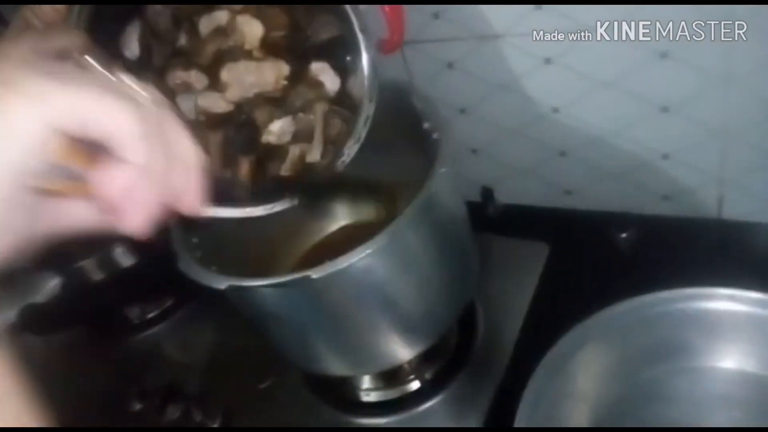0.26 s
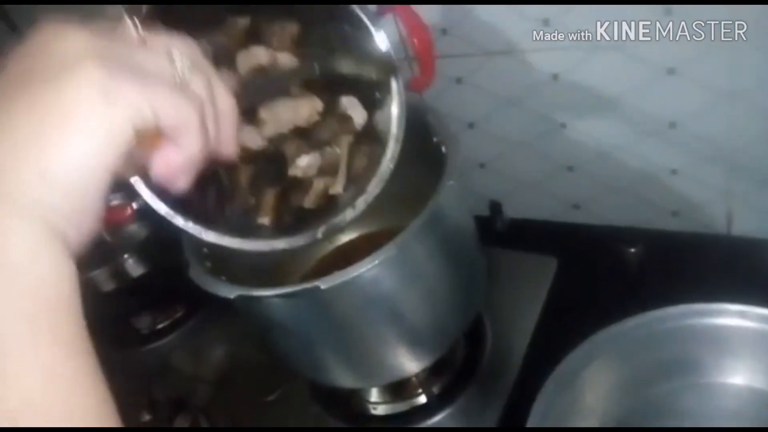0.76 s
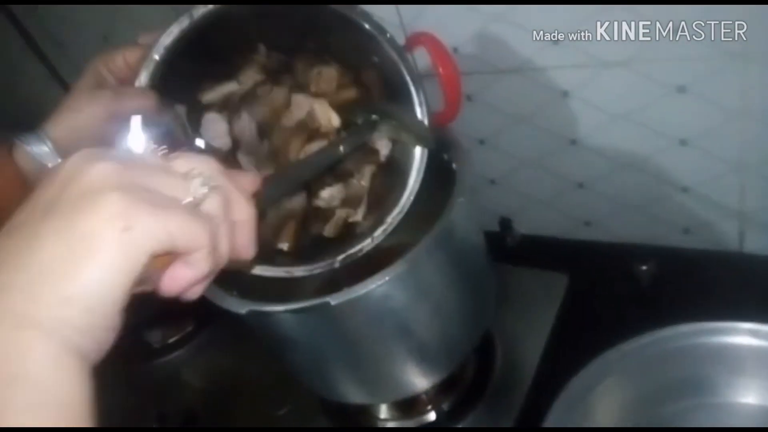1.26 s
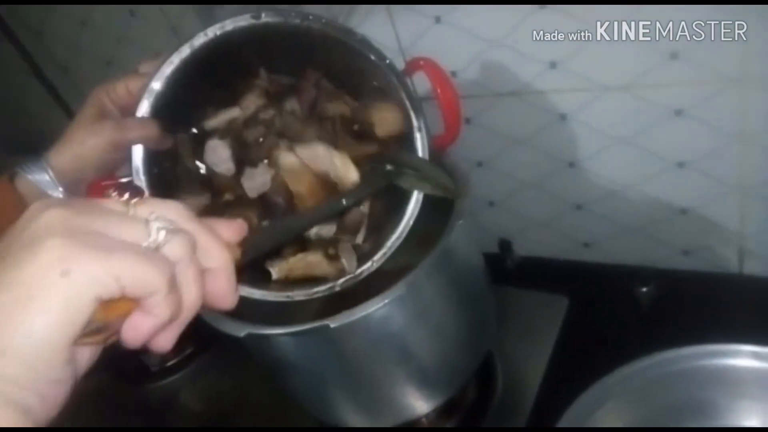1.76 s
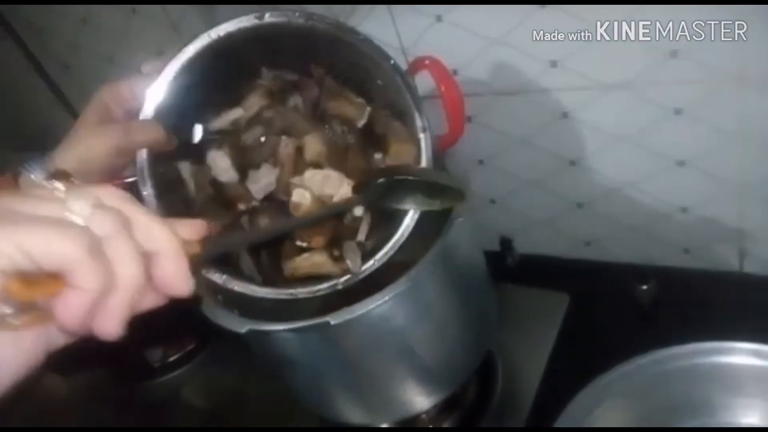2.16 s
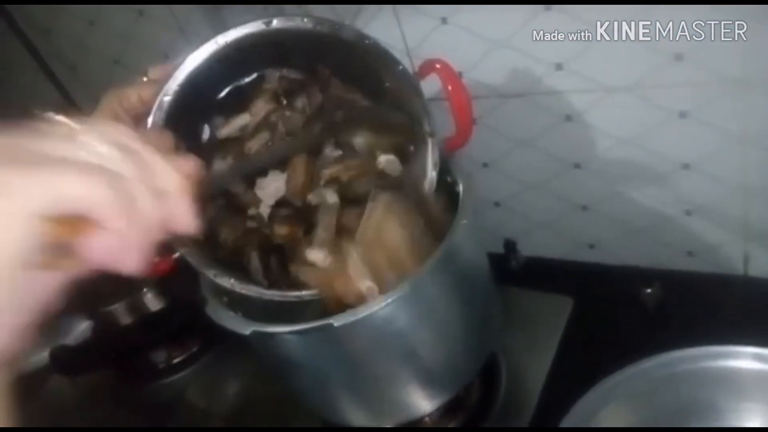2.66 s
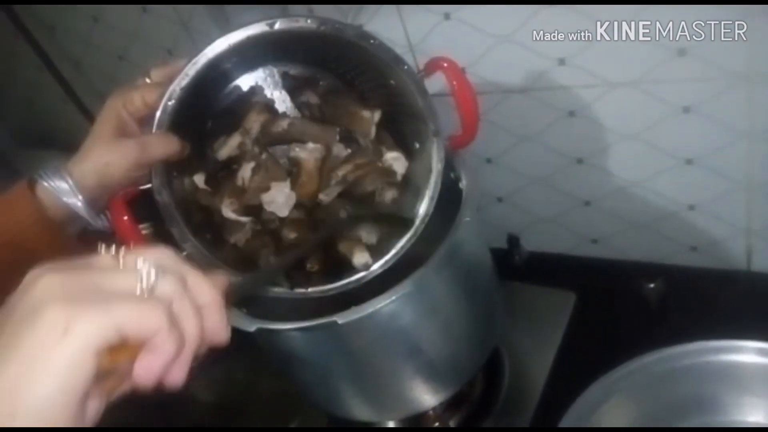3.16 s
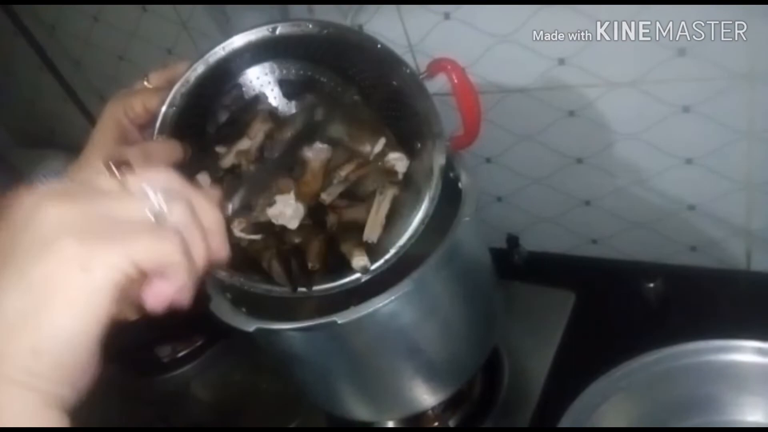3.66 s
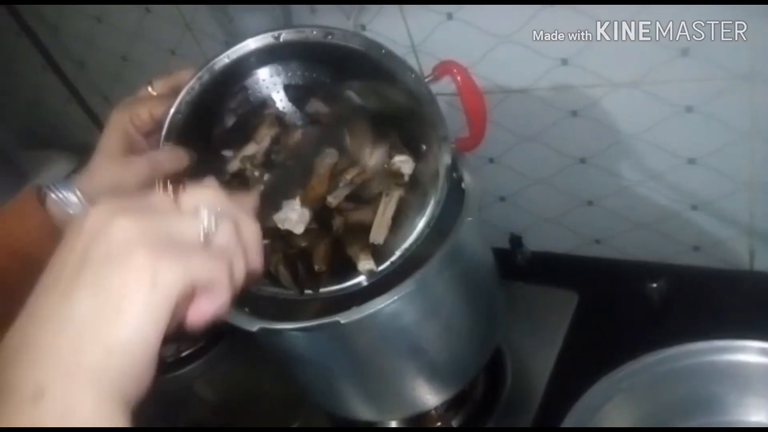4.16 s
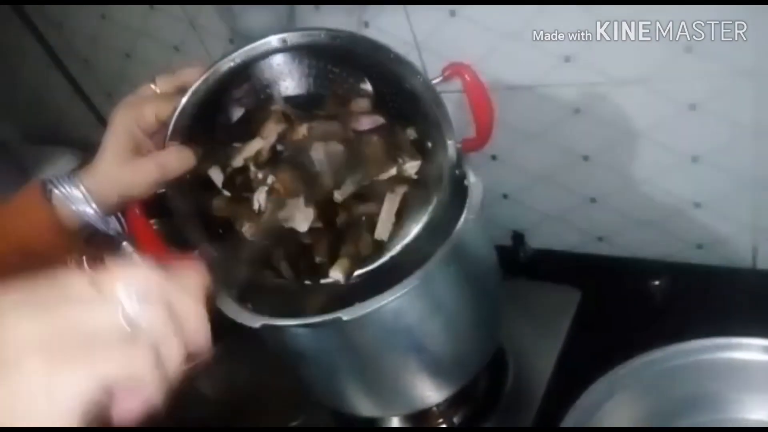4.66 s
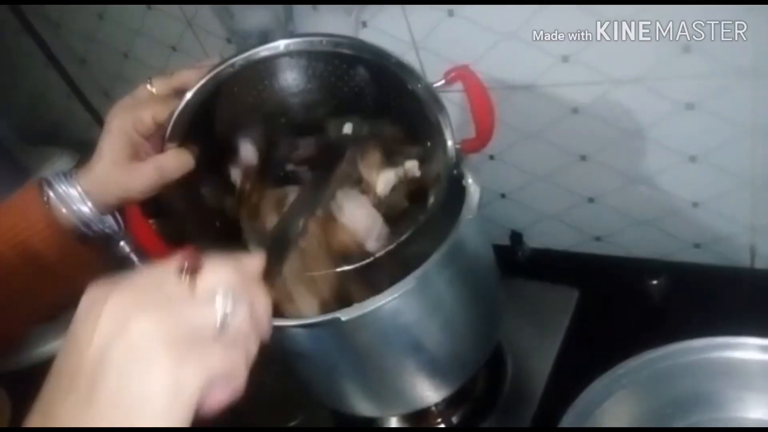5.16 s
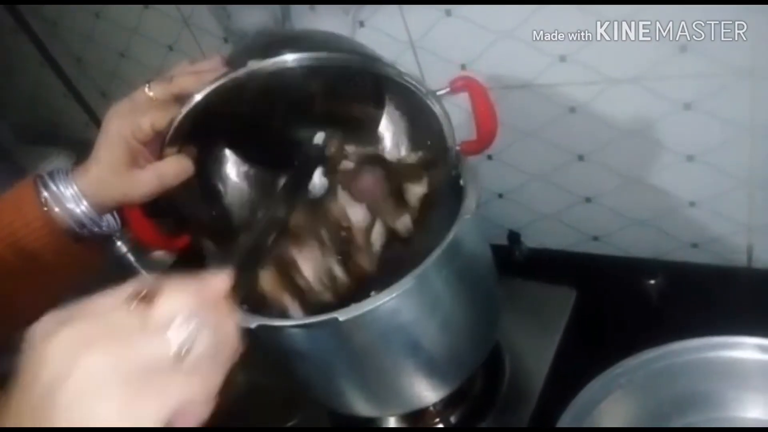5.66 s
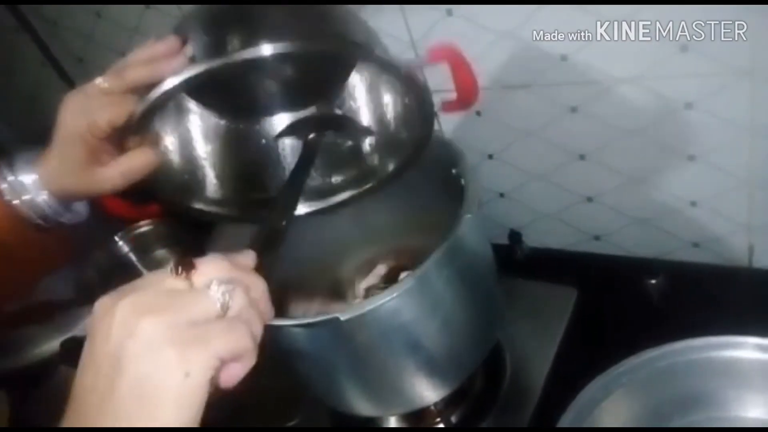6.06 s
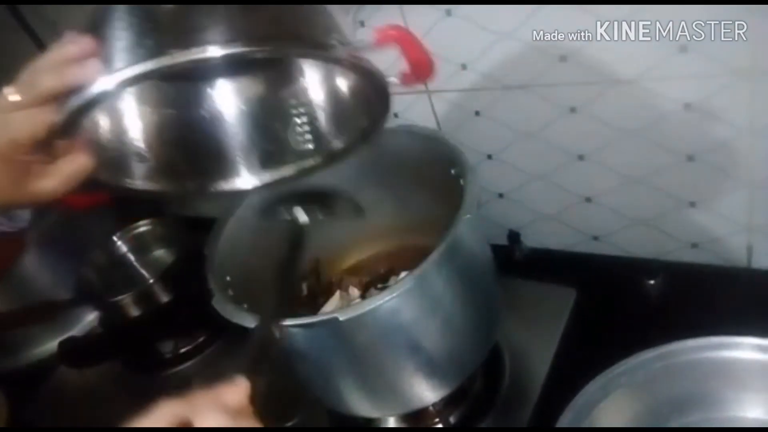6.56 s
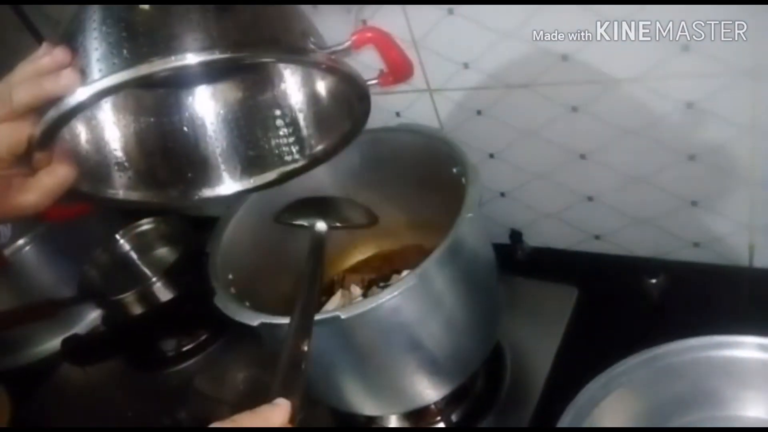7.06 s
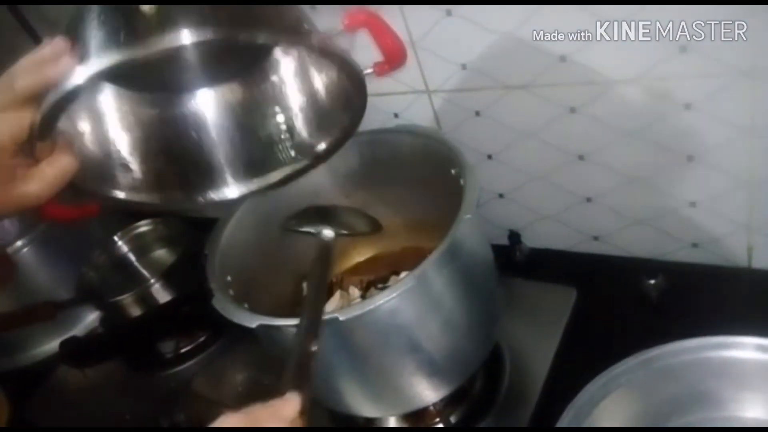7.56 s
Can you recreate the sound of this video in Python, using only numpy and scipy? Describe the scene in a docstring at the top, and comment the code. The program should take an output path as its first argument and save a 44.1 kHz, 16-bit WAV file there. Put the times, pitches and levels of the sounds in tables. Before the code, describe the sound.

Steel tool clanks and scrapes against a metal bowl in bursts, meat and bones rattling out and thudding into a deep pot, small kitchen, faint hum.

```python
"""In a small kitchen, pieces of meat and bone are pushed with a steel tool out of a colander into a pot.
Steel clanks on steel and rings: each blow excites damped modes and a noisy crack.
The heap rattles and slides as clumped clicks, and pieces thud as bumps that ring the pot's low modes.
Short pings are small clusters of close, wobbling, decaying sines, over a faint hum of filtered noise;
sparse taps form the room."""
import sys
import numpy as np
from scipy import signal
from scipy.fft import rfft, irfft
from scipy.io import wavfile
from scipy.ndimage import uniform_filter1d

SR = 44100
rng = np.random.default_rng(int(sys.argv[2]) if len(sys.argv) > 2 else 0)


def boost_factor(decibels):
    """Convert a level in decibels to a linear amplitude factor."""
    exponent = np.asarray(decibels, float) / 20
    return 10 ** exponent


def wav_out(sig):
    """Save sig, one row per channel (or a flat mono array), as 16-bit PCM at SR to the path in sys.argv[1]."""
    wavfile.write(sys.argv[1], SR, np.round(np.clip(np.atleast_2d(sig).T, -1, 1) * 32767).astype(np.int16))


N = 343980

# modes of the steel: f/Hz
STEEL_HZ = [650, 760, 925, 1200, 1430, 1615, 1760, 1994, 2270, 2468, 2855, 2908, 3110, 3234, 3720, 4270,
            4490, 4800, 4826, 5030, 5225, 5640, 5770, 6075, 6350, 6615, 7350, 8300, 8750, 10900]
# their decay and excitation, in the same order:
# t60/s of the free mode, relative level/dB when struck at the bowl bottom, bowl wall, tool, bowl rim
STEEL_MODES = [(0.069, -5.5, -23.5, -29, -26.5), (0.42, 2.5, -5, -21, -30.5), (0.11, -2, -11, -41, -42.5),
               (0.36, -7, -38, -15, -64.5), (0.054, 1, -8, -38.5, -12), (0.37, -19.5, 2.5, -37, -47),
               (0.044, -24, -13, -41, -39), (0.13, -15.5, 6.5, -19.5, -44.5),
               (0.033, -12.5, -1, -28.5, -7.5), (0.77, -24, -6, -72.5, -23.5), (0.33, -21.5, -40, -13, -22),
               (0.19, -19.5, -8, -2.5, -51), (0.045, -12.5, -21.5, -19, -10.5),
               (0.2, -14.5, -28, -4, -24.5), (0.17, -18, -5, -7.5, -41.5), (0.064, -38.5, -7.5, -39.5, -14),
               (0.17, -45.5, -15.5, -23, -64.5), (0.11, -29.5, -38, -10, 1.5), (0.16, -24, -42, -24, -1.5),
               (0.057, -44, -42.5, -16, -6), (0.077, -16, -63, -20, -17.5), (0.054, -13, -42, -3, -28),
               (0.4, -37.5, -55, -41.5, -4.5), (0.36, -29, -15.5, -45, -8), (0.32, -26, -19.5, -49.5, -6),
               (0.046, -23, -52, -70, -5), (0.14, -31.5, -13, -31.5, -5.5), (0.05, -58, -27, -24, -50.5),
               (0.04, -64.5, -45.5, -39, -30.5), (0.075, -54.5, -28.5, -48, -17)]


def read(points, hz):
    """Spectral interpolation: the value of a spectrum table on a log-frequency axis."""
    f, value = np.transpose(points)
    return np.interp(np.log(hz + 1), np.log(f + 1), value)


def evened(x):
    """Normalisation of power: scales to rms 1."""
    return x / np.sqrt(np.mean(x ** 2) + 1e-20)


def coloured(x, points):
    """Linear filtering: multiplies the spectrum of the last axis by a table in dB."""
    n = x.shape[-1]
    return irfft(rfft(x) * boost_factor(read(points, np.fft.rfftfreq(n, 1 / SR))), n)


def pair(alike, shape):
    """Partial coherence: two noises that share a part, alike being their correlation."""
    a, b = rng.standard_normal((2, *shape))
    alike = np.clip(alike, 0, 1)
    return np.array([a, alike * a + np.sqrt(1 - alike ** 2) * b])


def swells(rows, rise_db_s, fall_db_s):
    """Exponential envelopes: power of each event in steps of 32 samples, as rise, hold and fall."""
    s, db, hold = np.transpose(rows)[:3, :, None]
    t = np.arange(N // 32 + 1) * 32 / SR
    rise_db = rise_db_s * np.maximum(s - t, 0)
    fall_db = fall_db_s * np.maximum(t - s - hold, 0)
    return boost_factor(db - rise_db - fall_db) ** 2 + 1e-30


def stretched(steps):
    """Linear interpolation from steps of 32 samples to every sample."""
    return np.interp(np.arange(N) / 32, np.arange(len(steps)), steps)


def blows():
    """Modal excitation: the struck spots weight the steel modes, under a crack of like broad colour."""
    # blows: t/s, crack level/dB, bowl level/dB, place on the bowl, tool level/dB
    # place blends the two nearest spots: 0 bottom, 1 wall, 2 rim, and round to 3 bottom again
    blow_rows = [(.0044, -52, -60, 2.57, -52.5), (.185, -46, -50, 2.96, -57.5),
                 (0.2477, -24, -43.5, 2.21, -40), (0.2658, -33, -54.5, 2, -45),
                 (0.636, -55, -61, 0.34, -60.5), (0.7534, -45.5, -55, 0.18, -56),
                 (1.019, -43.5, -47, 0.044, -54), (1.4175, -59, -54.5, 0.072, -50.5),
                 (1.473, -53.5, -42.5, 2.5, -50), (1.5004, -27.5, -35, 2.49, -54.5),
                 (1.5199, -54, -42.5, .03, -51), (1.5924, -23.5, -30, 1.49, -34),
                 (1.627, -25, -44.5, 1.1, -29), (1.6993, -48, -46, 1.53, -36),
                 (1.8245, -30.5, -46, 0.19, -37), (2.2373, -63, -45.5, 0.12, -62.5),
                 (2.2508, -53, -46.5, 0.063, -63), (2.6718, -58.5, -69, 0.3, -67),
                 (2.714, -27.5, -34, 0.47, -33.5), (2.7982, -27.5, -59.5, 1.01, -67),
                 (2.809, -26, -37, 1.19, -35.5), (2.8499, -31.5, -42, 0.71, -47),
                 (2.884, -34, -64, 0.76, -64), (2.9364, -37, -56.5, 0.63, -65),
                 (3.0586, -48, -64, 0.19, -60), (3.104, -45, -54, 0.1, -54), (3.129, -29, -35, 0.34, -44),
                 (3.1794, -39, -49.5, 2.84, -42), (3.9, -48.5, -46.5, 2.74, -53.5),
                 (4.8959, -50.5, -55, 2.4, -78), (5.1559, -34, -51, 1.7, -69),
                 (5.199, -41.5, -72, 0.19, -78.5), (5.2649, -22, -26.5, 1.1, -25),
                 (5.3535, -29, -41.5, 0.53, -35), (5.3893, -70, -41, 0.82, -32.5),
                 (5.4363, -41, -59, 3.1, -39), (5.4917, -30.5, -39, 1.37, -41),
                 (5.819, -47.5, -56, 0.53, -100), (5.8665, -35.5, -49, 2.62, -59),
                 (5.8883, -37.5, -47, 0.31, -52), (5.9544, -43, -47.5, 0.21, -60),
                 (5.9867, -41.5, -70, 1.32, -63), (6.1406, -44.5, -80.5, 0.45, -72.5),
                 (6.401, -59.5, -66, 2.68, -77), (6.9486, -64.5, -73, 1, -68)]
    # spectrum of the crack: f/Hz, relative level/dB
    crack_colour = [(250, -10.5), (500, -6.5), (1000, 0.5), (2000, -6), (4000, -3.5), (6500, 4.5),
                    (7500, -5), (9000, -5), (13000, -19.5), (16000, -22.5)]
    far_spot_db = -27.5  # every spot of the bowl rings a little
    low_detune = .09  # full range, as a share of f: the heap loads the bowl anew for each blow
    twin_split, twin_share = .008, .7  # largest split as a share of f; amplitude of the twin
    dull_db, dull_hz = -14, 8000  # blows at the loaded bottom of the bowl lose their top
    soft_rise_s = .004  # the weakest blows are glancing and rise more slowly

    t, bins = np.arange(SR // 2) / SR, np.fft.rfftfreq(8192, 1 / SR) + 1
    hz, (t60, *spots_db) = np.array(STEEL_HZ), np.transpose(STEEL_MODES)
    first = SR // 40  # the 25 ms over which ring and crack are scaled
    # hand and meat choke most of the ring; a little rings on
    held = (boost_factor(-300 * t) + boost_factor(-27.0)) * (1 - np.exp(-t / 0.011))
    held /= np.sqrt(np.mean(held[:first] ** 2))
    rings = held * boost_factor(-60 * t / t60[:, None]) * np.exp(2j * np.pi * hz[:, None] * t)
    # a round bowl splits each mode in two, and the pair beats
    split_hz = twin_split * hz * rng.uniform(.5, 1, len(hz))
    twins = rings * np.exp(2j * np.pi * split_hz[:, None] * t)

    short = t[:8192]
    onset = 1 - np.exp(-short / 0.0021)
    snap, shimmer = boost_factor(-900 * short) * onset, boost_factor(-13.5 - 420 * short) * onset
    # spreads each mode over its neighbourhood
    octaves = np.log2(np.clip(bins, 500, 7000)[:, None] / hz)
    near = np.exp(-(octaves / 0.22) ** 2)

    out = np.zeros((2, N + len(t)))
    chance = rng.random((len(blow_rows), 4, len(hz)))
    for (s, crack_db, bowl_db, place, tool_db), (turn, side, scatter, load) in zip(blow_rows, chance):
        away = abs((place - np.arange(3) + 1.5) % 3 - 1.5)
        bottom, wall, rim = boost_factor(bowl_db) * (np.maximum(1 - away, 0) + boost_factor(far_spot_db))
        weight = np.array([bottom, wall, boost_factor(tool_db), rim]) @ boost_factor(np.array(spots_db))
        dulling_db = dull_db * max(1 - away[0], 0) / (1 + (dull_hz / bins) ** 4)
        colour = (near @ weight / near.sum(1)) ** 1.3 * boost_factor(read(crack_colour, bins) + dulling_db)

        weight = weight * boost_factor(9 * scatter - 6.3) * np.exp(2j * np.pi * turn)
        # each mode reaches the two ports in its own phase
        weight = np.array([weight, weight * np.exp(3.2j * (side - .5))])
        shift_hz = low_detune * hz * (load - .5)
        shifted = rings[:5] * np.exp(2j * np.pi * shift_hz[:5, None] * t)
        ring = weight[:, :5] @ shifted + weight[:, 5:] @ rings[5:]
        twin_ring = twin_share * weight * np.exp(2j * np.pi * load) @ twins
        sound = (ring + twin_ring).real

        noise = rfft(pair(0.11, (2, 8192))) * colour
        # thin steel: a thicket of narrow modes, new for each blow
        small_modes = 0.033 + (rng.random(len(bins)) < .04)
        # the contact chatters
        bounces = boost_factor(8.8 * evened(uniform_filter1d(rng.standard_normal(8192), 150)))
        crack = evened(irfft(noise[:, 0])) * snap * evened(bounces) ** .5
        crack = crack + evened(irfft(noise[:, 1] * small_modes)) * shimmer
        sound[:, :8192] += boost_factor(crack_db) * crack / np.sqrt(np.mean(crack[:, :first] ** 2))
        rise_s = soft_rise_s * np.clip(-crack_db / 20 - 1.5, .05, 1)
        sound *= np.minimum(t / rise_s, 1)
        at = max(round(s * SR) - 40, 0)
        out[:, at:at + len(t)] += sound
    return out[:, :N]


def shimmers():
    """Modal density: a dozen close modes of unlike strength and decay beat on after clanks and scrapes."""
    # clusters: t/s, level/dB before each mode's own loss, centre f/Hz, spread/Hz, nominal t60/s
    cluster_rows = [(.25, -33.5, 5120, 303.2, 0.35), (.25, -39.5, 5950, 600, 0.47),
                    (.25, -39, 6700, 450, 0.41), (.25, -39.5, 3050, 500, 0.4), (.27, -37, 724, 400, 0.22),
                    (.25, -47.5, 4300, 698, 0.34), (2.81, -29.5, 6100, 800, 0.17),
                    (2.809, -30, 3100, 2000, .1), (4.508, -52.5, 3350, 1000, .15),
                    (6.515, -62, 4700, 600, .3), (5.495, -45, 2880, 250, 0.53),
                    (5.495, -44, 1500, 900, 0.77)]
    t, out = np.arange(SR // 2) / SR, np.zeros((2, N + SR // 2))
    chance = rng.random((len(cluster_rows), 5, 12, 1))
    for (s, db, hz, spread, t60), (step, turn, side, size, life) in zip(cluster_rows, chance):
        modes_hz = hz + spread * ((np.arange(12)[:, None] + step) / 12 - .5)
        mode_t60 = t60 * (.8 + .4 * life)
        fading = boost_factor(db - 8 * size - 60 * t / mode_t60) / 2
        ports = []
        for port in (0, 1):
            cycles = modes_hz * t + turn + port * .6 * (side - .5)
            ports.append((fading * np.sin(2 * np.pi * cycles)).sum(0))
        out[:, round(s * SR):][:, :len(t)] += np.array(ports) * np.minimum(t / .004, 1)
    return out[:, :N]


def pings():
    """Free decay: lone modes of the steel, short pings and many faint random ones die exponentially."""
    # one steel mode stands out of a blow and rings until hand or meat stops it:
    # t/s, level/dB, f/Hz (the nearest steel mode is taken), t60/s, time it rings free/s
    free_rows = [(0.25, -17, 6615, 0.047, 0.023), (.249, -15.5, 5030, 0.029, .03),
                 (0.25, -29.5, 1430, 0.074, .03), (0.248, -19.5, 3110, 0.038, .03),
                 (.755, -46, 3234, 0.17, 0.053), (1.019, -52, 1994, 0.43, 0.073),
                 (1.418, -41.5, 3234, 0.15, .05), (1.506, -36, 3234, 0.4, 0.034),
                 (1.503, -29, 1430, 0.093, 0.018), (1.593, -15, 4800, 0.11, 0.014),
                 (1.592, -22.5, 1994, 0.16, 0.03), (1.6, -43, 5640, 0.66, 0.26),
                 (1.627, -12, 4826, 0.12, 0.012), (1.627, -14, 3234, 0.16, 0.016),
                 (1.64, -39, 2855, 0.67, 0.17), (1.64, -36, 3720, .4, 0.132),
                 (1.693, -32.5, 1994, .25, .02), (1.823, -31, 2855, 0.29, 0.094),
                 (1.823, -28, 4826, 0.099, 0.014), (2.715, -18.5, 1430, 0.052, 0.027),
                 (2.714, -24.5, 4800, 0.054, .03), (2.717, -32, 760, 0.52, 0.038),
                 (2.714, -31.5, 2908, 0.13, 0.025), (2.798, -27, 2270, 0.053, .02),
                 (2.799, -28.5, 1760, 0.15, 0.042), (2.93, -37.5, 1760, 0.25, 0.015),
                 (2.931, -38, 1430, 0.18, 0.027), (3.06, -48, 3720, 0.23, .03),
                 (3.105, -44, 3234, 0.17, 0.021), (3.129, -20, 1994, 0.11, 0.056),
                 (3.139, -33.5, 2468, 0.45, 0.05), (3.128, -33.5, 3234, 0.33, 0.032),
                 (3.129, -34.5, 925, 0.55, 0.13), (3.179, -33, 3234, 0.16, 0.05),
                 (3.177, -42.5, 4800, 0.16, .04), (3.21, -46.5, 1994, 0.67, .17),
                 (3.214, -46, 2468, 0.36, 0.16), (3.9, -44, 650, 0.23, 0.056),
                 (4.896, -54.5, 4270, 0.4, 0.16), (4.897, -47.5, 5225, .085, .05),
                 (5.266, -23.5, 3720, 0.32, 0.086), (5.267, -33, 1615, 0.28, .075),
                 (5.285, -35.5, 2468, 0.37, 0.06), (5.3, -36, 1994, 0.45, 0.05),
                 (5.352, -27, 3234, 0.19, 0.044), (5.36, -19.5, 2908, 0.093, 0.038),
                 (5.362, -33, 1994, 0.53, 0.11), (5.496, -18.5, 2908, 0.066, 0.0073),
                 (5.492, -27, 3720, 0.13, 0.039), (5.495, -27.5, 3234, 0.23, .03)]
    # short pings, some the brief rings of blows or the low onset of a thud, each with close modes:
    # t/s, level/dB, f/Hz
    ping_rows = [(.52, -54.5, 1510), (.601, -51.5, 1630), (2.071, -56, 1440), (2.352, -53.5, 1766),
                 (2.479, -51.5, 740), (2.984, -40, 2380), (3.549, -51.5, 795), (3.776, -51.5, 1446),
                 (3.972, -53.5, 2410), (4.049, -54.5, 2140), (4.138, -53, 2100), (4.238, -51.5, 2380),
                 (4.318, -55, 2376), (4.393, -55, 907), (4.41, -59, 4300), (4.574, -56.5, 2265),
                 (5.836, -46, 5370), (5.866, -35, 3920), (5.868, -28.5, 658), (5.868, -23, 174),
                 (5.886, -29, 221), (5.986, -33, 5110), (6.168, -44.5, 1308), (6.218, -57, 4150),
                 (7.108, -54, 1810), (7.109, -52.5, 2540), (6.685, -57, 4300), (7.554, -59, 1465),
                 (7.553, -55, 2950), (7.689, -55, 1340)]
    ping_t60_s, ping_t60_slope = 0.087, -0.41  # at 1 kHz; higher pings die sooner
    stopped_db_s = 900  # extra fall once a ring is stopped

    t, out = np.arange(SR // 4) / SR, np.zeros((2, N + SR // 4))
    onset = 1 - np.exp(-t / 0.00032)
    rows = []
    for s, db, hz, t60, free in free_rows:
        mode = np.argmin(abs(np.array(STEEL_HZ) - hz))
        rows.append((s, db, STEEL_HZ[mode], t60, free))
    short = [(s, db, hz, ping_t60_s * (hz / 1000) ** ping_t60_slope, 1) for s, db, hz in ping_rows]
    rows += short
    for step in (.94, 1.07):  # two weaker close modes beside each short ping
        rows += [(s + .003, db - 6, hz * step, t60, 1) for s, db, hz, t60, free in short]

    for (s, db, hz, t60, free), side in zip(rows, rng.uniform(-1, 1, len(rows))):
        # close modes drift apart and beat: heard as a wobble of the level
        drift_db = 4.5 * evened(uniform_filter1d(rng.standard_normal(len(t)), 300))
        wobble = boost_factor(np.minimum(t / .025, 1) * np.minimum(drift_db, 2))
        # low rings reach both ports nearly alike
        port_phase = np.array([[0], [1.6 * side * min(hz / 1000, 1)]])
        phase = 2 * np.pi * hz * t + port_phase
        fall_db = 60 * t / t60 + stopped_db_s * np.maximum(t - free, 0)
        out[:, round(s * SR):][:, :len(t)] += boost_factor(db - fall_db) * np.sin(phase) * onset * wobble

    for hz in np.geomspace(500, 4500, 30):
        faint = boost_factor(-66.5 + 6 * rng.random(N)) * (rng.random(N) < 1.5 / SR)  # 1.5 per second on average
        tone = np.sin(2 * np.pi * hz * t) * boost_factor(-2500 * t) * onset
        out[:, :N] += signal.oaconvolve(faint, tone)[:N]
    return out[:, :N]


def rattle():
    """Impulsive friction: bones slide over pierced steel in clumped clicks, part of them ringing the bowl."""
    # the heap slides over the steel: t/s, level/dB, hold/s
    slide_rows = [(.29, -42, 0.033), (.95, -55.5, 0.0064), (1.028, -53.5, 0.011), (1.42, -54, 0.021),
                  (1.515, -36, 0.0041), (1.63, -40, 0.086), (1.79, -51, 0.011), (2.22, -52.5, 0.047),
                  (2.79, -42, 0.0091), (2.86, -42, 0.068), (3.07, -50.5, 0.027), (3.17, -41.5, 0.027),
                  (3.91, -54, 0.033), (4.93, -58.5, 0.028), (5.15, -55.5, 0.12), (5.33, -32.5, 0.0074),
                  (5.45, -44, 0.035), (5.54, -44.5, .03), (5.63, -54, 0.058), (5.878, -37.5, 0.017),
                  (5.95, -50, 0.052)]
    # spectrum of the clicks: f/Hz, relative level/dB
    rattle_colour = [(240, -45.5), (400, 5.5), (496, -17.5), (921, 0), (1180, -14), (1760, -9),
                     (2290, -13.5), (5960, -33.5), (8500, -45.5), (15000, -46.5), (16000, -55)]
    rise_db_s, fall_db_s = 301.5, 183.5

    size = boost_factor(4.0 * np.minimum(rng.exponential(1, N), 3)) * (rng.random(N) < 700 / SR)  # 700 per second
    clicks = pair(0.19, (N,)) * size + 0.1 * pair(.5, (N,))
    t, piece, knocks = np.arange(SR // 8) / SR, rng.integers(0, 16, N), 0
    short = t[:2048]
    for k, hz in enumerate(np.geomspace(500, 7000, 16)):  # each piece knocks with its own short pitch
        knock = np.sin(2 * np.pi * hz * short) * np.exp(-hz * short / 5) * np.sqrt(hz)
        knocks = knocks + signal.oaconvolve(clicks * (piece == k), knock[None], axes=1)[:, :N]
    body = 0
    for hz, (t60, *spots_db) in zip(STEEL_HZ, STEEL_MODES):
        # the bowl under the heap decays faster than the free steel
        body = body + boost_factor(max(spots_db) - 60 * t / (0.6 * t60)) * np.sin(2 * np.pi * hz * t)
    rung = signal.oaconvolve(clicks, body[None], axes=1)[:, :N]
    chatter = evened(coloured(.5 * evened(clicks) + evened(knocks), rattle_colour))
    power = swells(slide_rows, rise_db_s, fall_db_s).sum(0)
    return (chatter + boost_factor(-9.0) * evened(rung)) * stretched(np.sqrt(power))


def thuds():
    """Cavity resonance: soft bumps of the heap ring the low modes of the pot, most the favoured one."""
    # pieces landing in the pot: t/s, level/dB, hold/s, favoured f/Hz
    thud_rows = [(0.136, -55.5, 0.0081, 174), (0.258, -49, 0.029, 345), (0.314, -43.5, 0.0091, 366),
                 (1.032, -39, 0.0072, 194), (1.07, -44, 0.013, 197), (1.488, -38.5, 0.011, 197),
                 (1.518, -38.5, 0.017, 221), (1.684, -40.5, .01, 244), (1.748, -35, 0.0056, 206),
                 (1.845, -44.5, 0.017, 266), (2.26, -50.5, 0.043, 225), (2.748, -40.5, .01, 197),
                 (2.82, -30, 0.03, 181), (2.883, -33.5, 0.049, 205), (2.983, -41, 0.015, 224),
                 (3.08, -39, 0.034, 184), (3.163, -44.5, 0.057, 246), (3.917, -44, 0.019, 203),
                 (3.986, -48.5, .02, 216), (4.93, -54.5, 0.024, 179), (5.187, -47, 0.029, 224),
                 (5.318, -34, 0.032, 205), (5.401, -33, 0.026, 206), (5.498, -36, 0.0075, 232),
                 (5.578, -45, 0.017, 324), (5.886, -30, 0.02, 180), (5.969, -39, 0.055, 205),
                 (6.148, -42, 0.036, 207), (6.26, -51, .02, 198)]
    # air and walls of the pot: f/Hz, relative level/dB, t60/s
    pot_modes = [(96, -20, 0.46), (126.1, -6, 0.4), (175.8, -0.5, 0.3), (220, -6, 0.12), (206, 6.5, 0.11),
                 (296.5, 0.5, 0.21), (342, 1.5, 0.18), (418, -1.5, .12), (639.4, -4, 0.12),
                 (681, -9.5, 0.09)]
    rise_db_s, fall_db_s = 355.5, 231

    size = boost_factor(2.8 * np.minimum(rng.exponential(1, N), 3))
    bumps = size * (rng.random(N) < 250 / SR) * rng.choice([-1, 1], N)  # 250 per second on average
    power = swells(thud_rows, rise_db_s, fall_db_s)
    favoured_hz = stretched(np.transpose(thud_rows)[3] @ power / power.sum(0))
    t, rung = np.arange(SR // 4) / SR, 0
    for hz, db, t60 in pot_modes:
        mode = boost_factor(db - 60 * t / t60) * np.sin(2 * np.pi * hz * t) * (1 - np.exp(-t / 0.0024))
        near = boost_factor(-7 * np.minimum(abs(np.log2(favoured_hz / hz)) / .45, 1))
        rung = rung + near * signal.oaconvolve(bumps, mode)[:N]
    running_rms = np.sqrt(abs(uniform_filter1d(rung ** 2, 3000)) + 1e-9)
    port_gain = boost_factor(np.array([[1.3], [-1.3]]))
    return rung / running_rms * stretched(np.sqrt(power.sum(0))) * port_gain


def kitchen(x):
    """Reverberation: sparse taps of random sign, each band dying at its own speed."""
    # decay of the room: f/Hz, t60/s
    room_t60 = [(200, 0.69), (1000, 0.36), (4000, 0.39), (8000, 0.26), (15000, 0.34)]
    taps = np.zeros((2, SR // 2))
    cells = np.arange(200, SR // 2 - 20, 20)  # one tap in every 20 samples
    at = cells + rng.integers(0, 20, (2, len(cells)))
    np.put_along_axis(taps, at, rng.choice([-1., 1.], at.shape), 1)
    hz, t, z = signal.stft(taps, SR, nperseg=256)
    decay = boost_factor(-60 * t / read(room_t60, hz)[:, None])
    tail = signal.istft(z * decay, SR, nperseg=256)[1]
    return signal.oaconvolve(x, tail / np.linalg.norm(tail[0]), axes=1)[:, :N]


def hum():
    """Stationary noise: random short-time spectra with drifting patches and a few fuzzy bands."""
    # spectrum of the hum: f/Hz, relative level/dB
    hum_colour = [(22, -20), (43, -31.5), (70, 4), (120, 3), (270, 0), (310, -1.5), (347, 2.5), (542, -15),
                  (590, -15.5), (849, -14), (1150, -11), (3340, -16), (4420, -16.5), (16000, -37.5)]
    # vessels that colour the hum: f/Hz, width/Hz, nominal boost/dB
    vessel_bands = [(618.2, 45, 17), (880, 66, 17.5), (1470.5, 110, 8.5), (1807, 46, 8.5)]
    # left-right correlation, limited to 0..1 in use: f/Hz, correlation
    likeness = [(60, 0.58), (180, 1), (550, 0.77), (1650, 0.34), (4970, 0.41), (15000, -1.2)]
    hum_db = -58

    frames, hz = N // 256 + 5, np.fft.rfftfreq(1024, 1 / SR)
    grain = uniform_filter1d(rng.standard_normal((frames, 513)), 12, 0)
    patches = evened(uniform_filter1d(grain, 10, 1)).T
    flicker = evened(uniform_filter1d(rng.standard_normal(frames), 8))
    re, im = (pair(read(likeness, hz), (frames, 513)).transpose(0, 2, 1) for _ in "ri")
    # the bands come and go
    drift = evened(uniform_filter1d(rng.standard_normal((len(vessel_bands), frames)), 30))
    waver = np.clip(.85 + .27 * drift, 0, 1.2)
    bands_db = 0
    for (centre, width, db), share in zip(vessel_bands, waver):
        bands_db = bands_db + np.outer(db / (1 + (2 * (hz - centre) / width) ** 2), share)
    unrest_db = 2.2 * patches + 1.1 * flicker
    z = (re + 1j * im) * boost_factor(read(hum_colour, hz)[:, None] + bands_db + unrest_db)
    return boost_factor(hum_db) * evened(signal.istft(z, nperseg=1024, noverlap=768)[1][:, :N])


def scene():
    """Superposition of sources and room; the hum comes from one side and reaches the left port later."""
    # port imbalance: f/Hz, level/dB added at the left port and taken from the right
    port_tilt = [(200, .6), (1000, 1.2), (8000, -.7)]
    left_lag = 7  # samples
    steel, lone, pot, aside = blows() + shimmers(), pings(), thuds(), hum()
    aside[0] = np.roll(aside[0], left_lag)
    room = boost_factor(-5.5) * kitchen(steel + .5 * lone + 0.091 * pot)
    left, right = steel + lone + pot + room + rattle() + aside
    return np.array([coloured(left, port_tilt), coloured(right, np.array(port_tilt) * [1, -1])])


def roll_off(x):
    """The treble ends steeply here."""
    return signal.sosfilt(signal.butter(12, 16640, fs=SR, output="sos"), x)


def record(dry):
    """Transducer response: the microphone weights the spectrum of the mix."""
    # microphone response: f/Hz, level/dB
    microphone = [(45, -7.5), (100, -1), (7000, 1.5), (8500, -3.5), (13800, 1), (14900, 5), (15600, 2.5),
                  (16200, -23)]
    return roll_off(coloured(dry, microphone))


dry = scene()
out = record(dry)
wav_out(out)
```